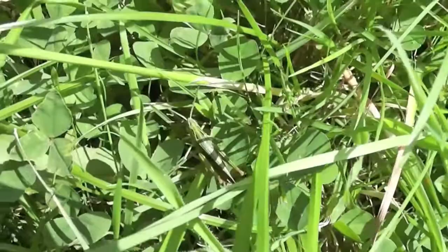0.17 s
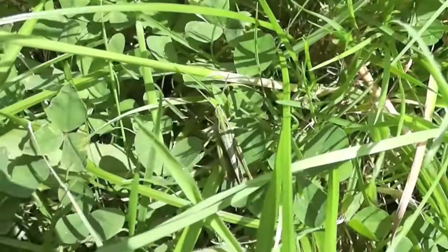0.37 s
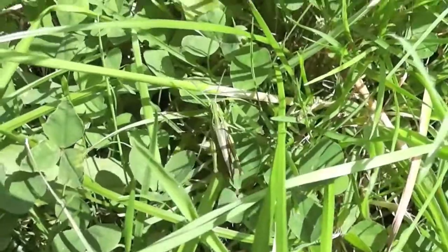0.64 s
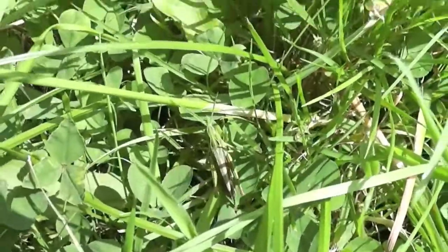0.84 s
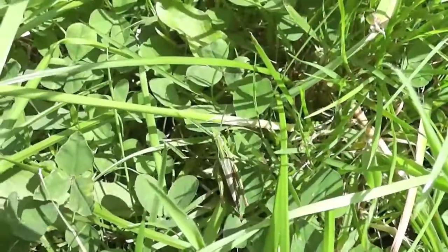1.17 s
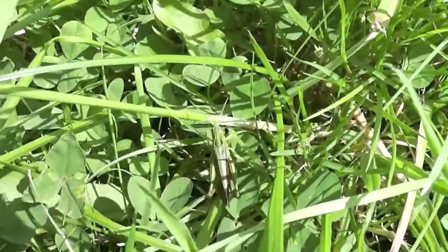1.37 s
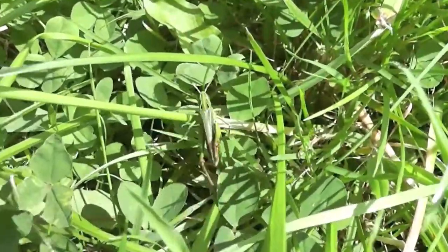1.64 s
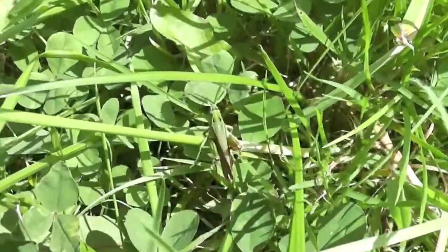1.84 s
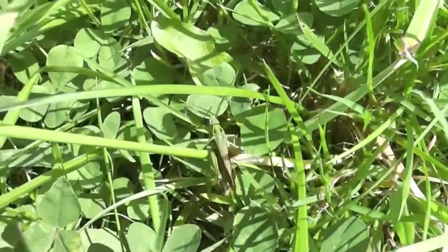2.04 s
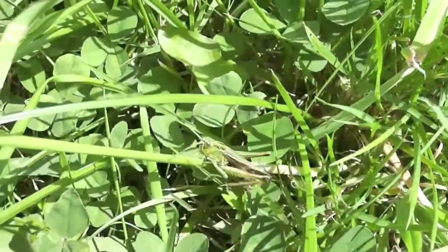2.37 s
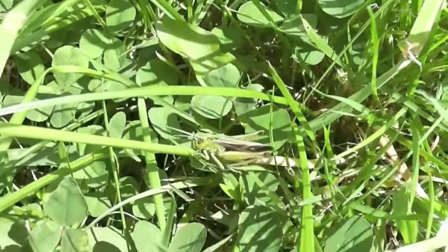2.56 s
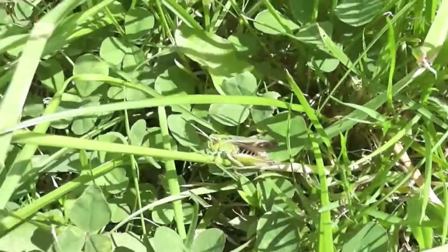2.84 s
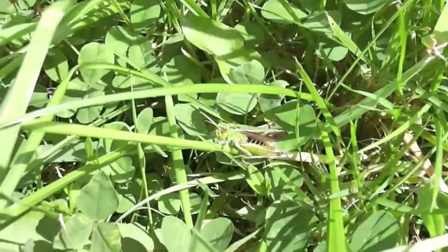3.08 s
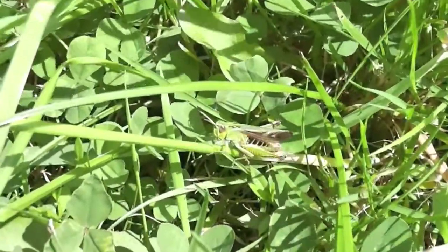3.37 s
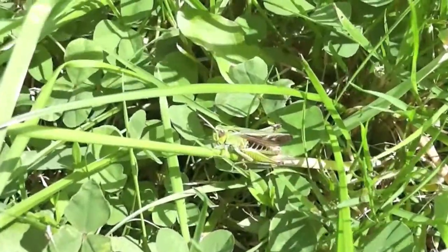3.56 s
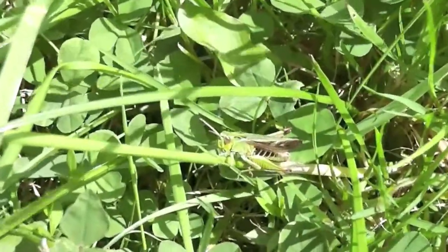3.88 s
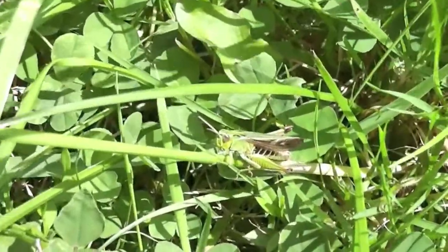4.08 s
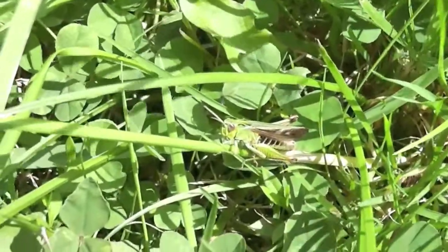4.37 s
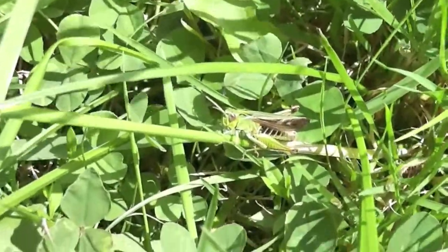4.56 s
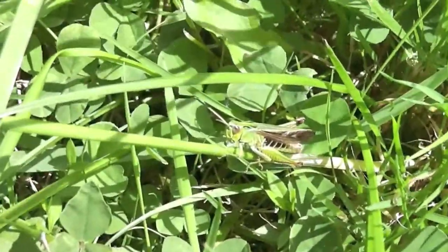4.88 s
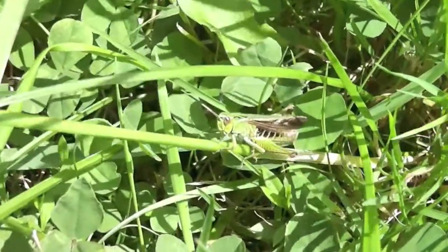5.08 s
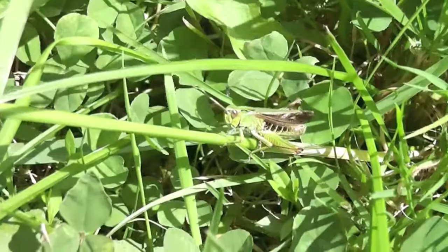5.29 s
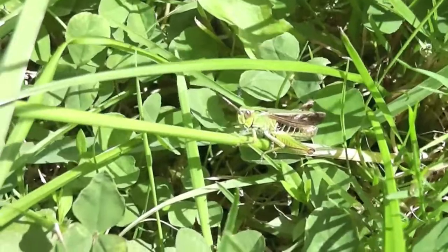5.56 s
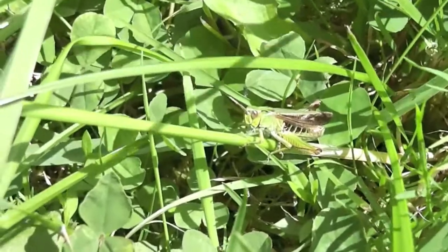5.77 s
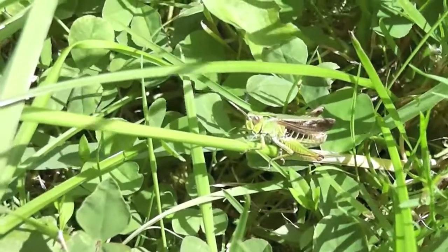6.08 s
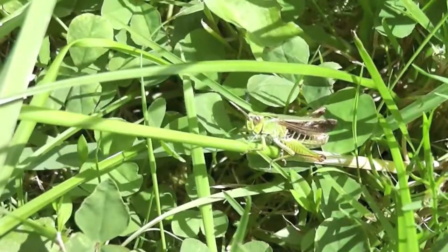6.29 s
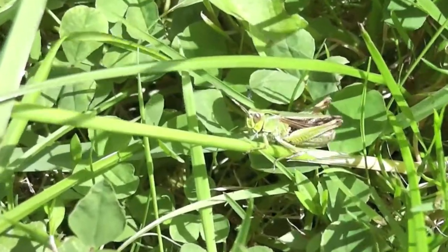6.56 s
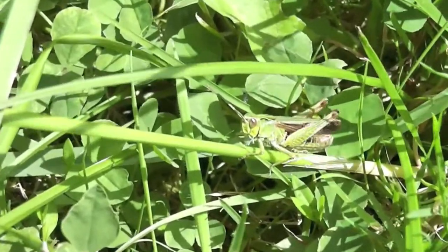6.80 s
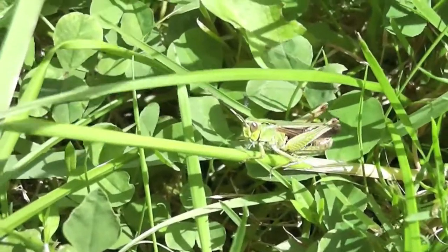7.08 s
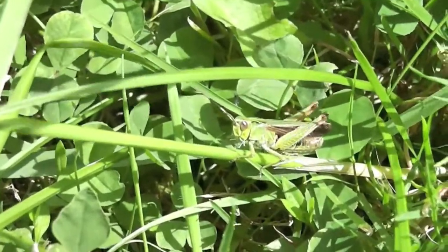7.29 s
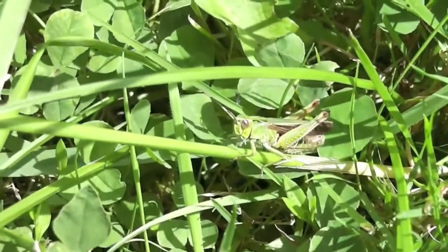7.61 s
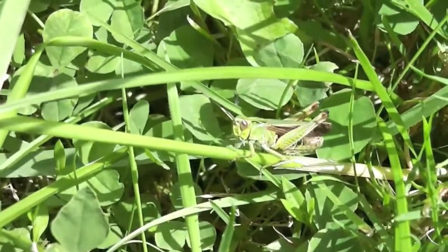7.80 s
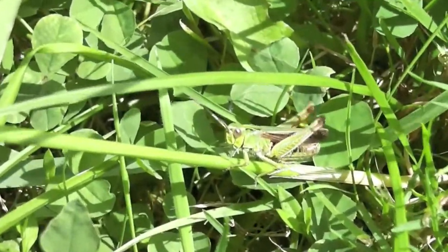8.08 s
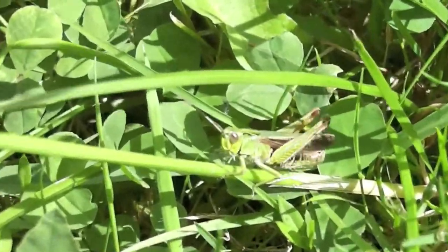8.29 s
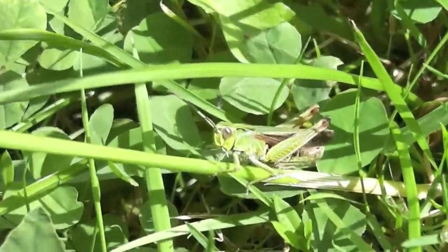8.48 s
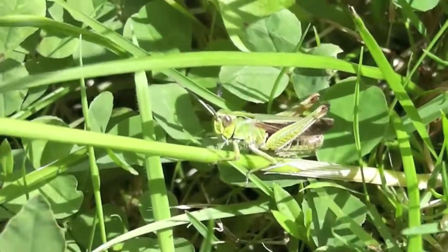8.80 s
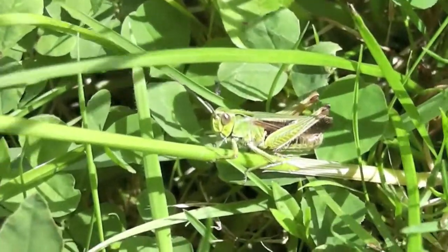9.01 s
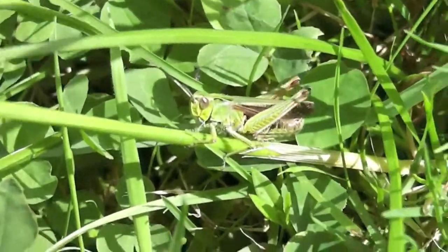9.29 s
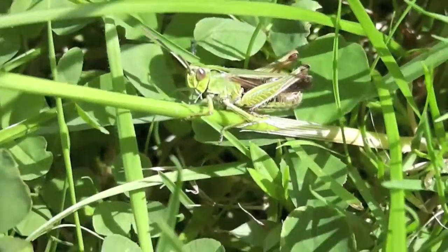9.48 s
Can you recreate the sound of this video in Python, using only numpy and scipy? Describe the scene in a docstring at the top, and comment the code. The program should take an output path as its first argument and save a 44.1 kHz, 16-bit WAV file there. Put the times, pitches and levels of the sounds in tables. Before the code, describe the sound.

A grasshopper close by shifts with dry ticks, then sings a fast, swelling, raspy buzz over a steady low machinery rumble outdoors.

```python
"""Grasshopper in clover

A grasshopper sits in clover a hand's width from a small stereo microphone. It shifts its legs with dry ticks
as leaves brush, then sings: pegs on the leg snap over a wing vein and ring the wing, in swelling strokes that
slow from about 21 to 19 a second. Far off, machinery hums as wavering tones and buzzes as throbbing noise, over
a rumble and hiss of shaped noise. Lumpy low noise sits opposite in left and right for a while, low knocks thud,
and one faint tick sounds early on.
"""
import sys
import numpy as np
from scipy import signal
from scipy.fft import rfft, irfft, next_fast_len
from scipy.io import wavfile
from scipy.ndimage import uniform_filter1d

SR = 44100
rng = np.random.default_rng(int(sys.argv[2]) if len(sys.argv) > 2 else 0)


def store_wav(level_fs):
    """Save 16-bit WAV to argv[1]."""
    pcm = np.round(np.clip(np.atleast_2d(level_fs), -1, 1) * 32767)
    wavfile.write(sys.argv[1], SR, pcm.T.astype(np.int16))


N = 425565  # samples in the scene


def from_db(db):
    """Gain of a level in dB."""
    return 10 ** (np.asarray(db) / 20)


def rms_one(x):
    """Scaled to rms 1."""
    return x / np.sqrt(np.mean(x ** 2) + 1e-20)


def in_time(rows):
    """Each column of a curve at every sample."""
    s, *columns = np.transpose(rows)
    return [np.interp(np.arange(N) / SR, s, column) for column in columns]


def over_hz(rows, hz):
    """Each column of a table read on a log-frequency axis."""
    at_hz, *columns = np.transpose(rows)
    return [np.interp(np.log(hz), np.log(at_hz), column) for column in columns]


def add(out, s, sound, peak_db):
    """Mixes a short sound in at s seconds, scaled to a peak level."""
    start = round(s * SR)
    out[start:start + len(sound)] += from_db(peak_db) * sound / np.abs(sound).max()


def resonance(x, hz, width_hz):
    """Two-pole band-pass with gain 1 on top."""
    r = np.exp(-np.pi * width_hz / SR)
    b = [(1 - r * r) / 2, 0, (r * r - 1) / 2]
    a = [1, -2 * r * np.cos(2 * np.pi * hz / SR), r * r]
    return signal.lfilter(b, a, x + 1e-18)


def double_resonance(x, hz, width_hz):
    """The same resonance twice in a row: a slower onset and steeper sides."""
    return resonance(resonance(x, hz, width_hz), hz, width_hz)


def steadied(drive, hz, width_hz):
    """The drive evened out over 4 ms, so that a resonance at hz rings more steadily."""
    power = double_resonance(drive, hz, width_hz) ** 2
    local = uniform_filter1d(power, size=round(4 * SR / 1000))
    return drive * np.sqrt(power.mean() / (local + 0.26 * power.mean()))


def waver(width_hz):
    """Slow complex noise of about rms 1: a tone multiplied by it spreads over about width_hz."""
    r = np.exp(-80 * np.pi * width_hz / SR)  # one slow point every 40 samples
    noise = rng.standard_normal((2, N // 40 + 2002))
    re, im = signal.lfilter([1], [1, -2 * r, r * r], noise)[:, 2000:]  # skip the filter's start
    slow = (re + 1j * im) / np.sqrt(np.mean(re ** 2 + im ** 2))
    return np.interp(np.arange(N) / 40, np.arange(len(slow)), slow)


def pegs(per_s, uneven_db):
    """Leg pegs snapping over the wing vein one after another, unevenly spaced and sized; rms 1."""
    count = int(2 * per_s * N / SR)
    at = np.cumsum(SR / per_s * rng.uniform(.5, 1.5, count)).astype(int)
    size = from_db(uneven_db * np.clip(rng.standard_normal(count), -3, 2)) * rng.choice([-1, 1], count)
    out = np.zeros(N)
    out[at[at < N]] = size[at < N]
    return rms_one(out)


# How far sound differs between the two channels, by frequency:
# (frequency [Hz], side under mid [dB], left over right [dB], phase by which left leads [radians])
CHANNEL_DIFFERENCES = [(30, -70, 0, 0), (1100, -60, 0, 0), (1400, -15, 0, 0), (2000, -9, 1.5, .4),
                       (2500, -7, 1, .4), (3400, -10, 5.5, .6), (4000, -6, 5, .5), (5500, -9, 6.5, .9),
                       (6500, -8, 4.5, 1.6), (7600, -7, 2, 2.8)]


def far_noise(spectrum):
    """Stereo noise of a spectrum, partly alike in the two channels; rms 1."""
    size = next_fast_len(N)
    hz = np.arange(1, size // 2 + 2) * SR / size
    side_db, lean_db, lead = over_hz(CHANNEL_DIFFERENCES, hz)
    mid, side = rfft(rng.standard_normal((2, size))) * from_db(over_hz(spectrum, hz)[0])
    left = (mid + from_db(side_db) * side) * from_db(lean_db / 2)
    right = (mid - from_db(side_db) * side) * from_db(-lean_db / 2) * np.exp(-1j * lead)
    return rms_one(irfft([left, right], size)[:, :N])


RUMBLE_SURGE_DB = 0.5  # scale of the random surges
# Background levels before each layer's own trim:
# (time [s], deep rumble [dB], upper rumble [dB], air hiss [dB], far machine buzz [dB])
BACKGROUND_LEVELS = [(0, -21, -34, -46.5, -55), (.5, -23, -34.5, -46, -48.5),
                     (2.2, -24.5, -34, -47.5, -52.5), (2.85, -25, -34.5, -47.5, -58),
                     (2.92, -23.5, -32.5, -42.5, -52), (3.05, -22.5, -33.5, -43, -51),
                     (3.15, -21, -32.5, -44, -55), (3.3, -24, -31.5, -44, -58),
                     (3.42, -24.5, -34, -44.5, -55), (3.55, -25.5, -35, -45, -50.5),
                     (4.2, -25.5, -36.5, -47, -50.5), (5.1, -24, -35, -47.5, -54),
                     (5.9, -29.5, -35.5, -45.5, -50), (6.18, -18.5, -35.5, -46.5, -53.5),
                     (6.9, -24, -35.5, -49, -56.5), (7.0, -17.5, -32, -45, -53.5),
                     (7.4, -22.5, -36.5, -46.5, -58), (8.0, -24, -36.5, -47.5, -52.5),
                     (9.65, -25, -36.5, -46, -56.5)]


def background_levels():
    """Background levels over time, the upper rumble surging at random."""
    deep_db, upper_db, hiss_db, buzz_db = in_time(BACKGROUND_LEVELS)
    return deep_db, upper_db + RUMBLE_SURGE_DB * waver(2.0).real, hiss_db, buzz_db


# Spectrum shapes of the deep and the upper rumble: (frequency [Hz], relative density [dB per Hz])
DEEP_SPECTRUM = [(20, -35.5), (35, -25.5), (55, -8), (100, -3), (200, 1), (330, -1), (420, -5.5),
                 (600, -48.5)]
UPPER_SPECTRUM = [(250, -31), (340, 2), (420, -1), (520, -5), (750, -17), (1000, -27), (1500, -55.5)]


def rumble(deep_db, upper_db):
    """Far rumble: two bands of noise, the deep one surging at random on its own."""
    deep = from_db(deep_db - 5.5 + RUMBLE_SURGE_DB * waver(2.7).real) * far_noise(DEEP_SPECTRUM)
    upper = from_db(upper_db + 0.5) * far_noise(UPPER_SPECTRUM)
    return deep + upper


# Spectrum shape of the air hiss: (frequency [Hz], relative density [dB per Hz])
HISS_SPECTRUM = [(500, -5), (1000, -3), (1400, -3), (1900, 2), (2250, -5), (2600, -13), (3300, -9.5),
                 (3950, -10.5), (4900, -9.5), (5500, -7), (6500, -9.5), (7400, -14.5), (7700, -59),
                 (9000, -84)]


def hiss(hiss_db):
    """Air hiss: shaped noise that follows its level curve."""
    return from_db(hiss_db + 2.5) * far_noise(HISS_SPECTRUM)


BUZZ_THROB_HZ, BUZZ_THROB_DB = 68.2, 4.5  # the rate of a strong low hum tone; swing each way
# Spectrum shape of the far machine buzz: (frequency [Hz], relative density [dB per Hz])
BUZZ_SPECTRUM = [(2500, -27.5), (3000, -3), (3400, 0.5), (3750, -7.5), (4200, -29.5)]


def buzz(buzz_db):
    """Far machine buzz: noise near 3.4 kHz, throbbing 68 times a second and flickering at random."""
    throb_db = BUZZ_THROB_DB * np.cos(2 * np.pi * BUZZ_THROB_HZ * np.arange(N) / SR)
    return from_db(buzz_db - 2.5 + 2.6 * waver(47).real + throb_db) * far_noise(BUZZ_SPECTRUM)


# Far machinery: (frequency [Hz], steady level [dB rms], wavering level [dB rms], width [Hz])
HUM_TONES = [(48.7, -55.5, -54, 2.3), (68.2, -45, -42, 6.7), (99.2, -42, -42.5, 3.3),
             (136.44, -31.5, -40.5, 6.5), (148.7, -38, -39.5, 3.3), (199, -49, -39.5, 3.3),
             (234.6, -43.5, -48, 2.8), (252.1, -38, -39, 5.9), (293.9, -42, -42, 5.1),
             (426.7, -51, -52, 1.5), (480.6, -48, -47, 8), (594.3, -48, -55.5, 3.3), (635, -66.5, -63, 6.6),
             (717, -66, -60.5, 10), (1112, -76.5, -60.5, 16), (1307, -78, -64, 23)]


def hum(upper_db):
    """Far tones waver on their way through the air; those above 400 Hz partly follow the upper rumble."""
    t, out = np.arange(N) / SR, np.zeros(N)
    lift = from_db(upper_db - upper_db.mean())
    for hz, steady_db, waver_db, width_hz in HUM_TONES:
        strength = from_db(steady_db) + from_db(waver_db) * waver(width_hz)
        carried = np.sqrt(lift) if hz > 400 else 1
        out += carried * (strength * np.exp(2j * np.pi * hz * t)).real
    return np.sqrt(2) * out  # a sine of rms 1 peaks at sqrt(2)


# A hum tone that beats and fades: (time [s], level before waver and left-right lean [dB])
WHINE_LEVELS = [(0.0, -37), (0.05, -23), (0.13, -33.5), (0.35, -23.5), (0.4, -32.5), (0.64, -19.5),
                (0.78, -37.5), (0.88, -29), (1.83, -35.5), (2.23, -32), (2.52, -46), (2.61, -35),
                (3.89, -36.5), (4.06, -32), (4.11, -53), (4.16, -36), (4.35, -29), (4.49, -47), (4.76, -25),
                (4.97, -49), (5.16, -23), (5.24, -47), (5.29, -30.5), (5.54, -47), (5.59, -29.5),
                (5.91, -42), (6.15, -42), (7.2, -36), (7.26, -54), (7.31, -43), (7.47, -30.5), (7.52, -46),
                (7.74, -29), (7.79, -55), (8.04, -32), (8.19, -60), (8.3, -39.5), (8.79, -51), (9.54, -43),
                (9.65, -39)]
# Its drifting pitch: (time [s], frequency [Hz])
WHINE_PITCH = [(0, 375), (.65, 371), (1.5, 373), (3, 372.7), (5, 370.4), (6.5, 373), (9.65, 369.3)]


def whine():
    """One drifting machinery tone that beats and fades, slightly louder on the left."""
    phase = 2 * np.pi * np.cumsum(in_time(WHINE_PITCH)[0]) / SR
    tone = ((1 + 0.23 * waver(4.05)) * np.exp(1j * phase)).real
    return np.sqrt(2) * from_db(in_time(WHINE_LEVELS)[0]) * tone * from_db([[.4], [-.4]])


SIDE_START_S, SIDE_END_S, SIDE_EDGE_S = 2.49, 6.04, 0.17  # the edges lie outside start and end
SIDE_DB = -43  # level about which the noise wavers


def low_side_noise():
    """Lumpy low noise, opposite in left and right, from about 2.3 to 6.2 s."""
    t = np.arange(N) / SR
    fade = np.clip(np.minimum(t - SIDE_START_S, SIDE_END_S - t) / SIDE_EDGE_S + 1, 0, 1) ** 2
    band = signal.butter(3, [18, 110], "band", fs=SR, output="sos")
    low = rms_one(signal.sosfilt(band, rng.standard_normal(N)))
    return fade * from_db(SIDE_DB + 4.5 * waver(3.0).real) * low * [[1], [-1]]


KNOCK_T60_S, KNOCK_RISE_S = 0.1, 0.001  # of the noise before filtering
# Dull low knocks: (time [s], peak level before a 3 dB cut [dB], pitch [Hz])
KNOCK_EVENTS = [(3.045, -15.5, 485), (3.126, -21, 476), (3.246, -23, 430), (3.3, -26, 600),
                (3.349, -12.5, 145), (6.141, -13, 264), (6.175, -15.5, 199), (6.269, -17.5, 222),
                (6.38, -17.5, 181), (6.519, -13.5, 273), (6.687, -17, 137), (6.771, -16, 348),
                (6.875, -11.5, 137), (6.982, -12.5, 133), (7.141, -21, 135), (7.761, -19, 141)]


def knocks():
    """Low puffs of noise with a dull ring, the same in both channels."""
    out, band = np.zeros(N), signal.butter(2, [90, 550], "band", fs=SR, output="sos")
    age = np.arange(SR // 3) / SR
    shape = from_db(-60 * age / KNOCK_T60_S) * (1 - np.exp(-age / KNOCK_RISE_S))
    for s, peak_db, hz in KNOCK_EVENTS:
        puff = signal.sosfilt(band, rng.standard_normal(len(age)) * shape)
        add(out, s, 0.5 * puff + resonance(puff, hz, 60), peak_db - 3.0)
    return out


CRACKLES_PER_S, CRACKLE_SHARE = 760, 0.45
# Spectrum shape of rubbing leaves: (frequency [Hz], relative density [dB per Hz])
LEAF_SPECTRUM = [(1000, -26.5), (2000, -11), (4000, 3), (6000, 0.5), (7200, -3.5), (8000, -31)]
# Leaves brushed close by: (time [s], starting level before the mix of grains and crackle [dB], t60 [s])
LEAF_BRUSHES = [(2.897, -47, 1), (3.25, -43, .12), (3.277, -43, .1), (3.37, -41, .1), (3.38, -60, 1.4)]


def rustle():
    """Each brush starts at once and dies away; the leaves rub in small grains and crackle."""
    t = np.arange(N) / SR
    level = sum((t > s) * from_db(db - 60 * np.abs(t - s) / t60) for s, db, t60 in LEAF_BRUSHES)
    grains = from_db(2.7 * waver(60).real) * far_noise(LEAF_SPECTRUM)
    snaps = pegs(CRACKLES_PER_S, uneven_db=7.5)  # same uneven train of impulses as the leg pegs
    crackle = rms_one(double_resonance(snaps, 5700, 1800)) * from_db([[3], [-3]])
    return level * (1.2 * grains + CRACKLE_SHARE * crackle)


LEAF_COVER_HZ = 7900  # ticks under the leaves lose their top
TICK_START_SHARE = .55  # a scratch starts at this share of its strength and swells
# Legs shifting on the stem: (time [s], peak level before leaf cover and left-right lean [dB],
# pitch [Hz], scratch length [ms], t60 of the scratch [s], amount of broad ring [0-1])
LEG_TICKS = [(2.894, -38, 6300, 1, .008, .2), (2.8992, -28, 5300, 1.5, .02, .3),
             (2.905, -33, 6460, 3, .02, .2), (2.9135, -41, 5600, .5, .008, .3),
             (2.922, -38, 5500, .5, .008, .2), (3, -31, 5700, 1.9, .01, .6),
             (3.0452, -29, 5200, 1, .008, 1.0), (3.053, -36, 6100, .5, .01, .2),
             (3.0664, -32, 6140, 2, .01, .3), (3.0875, -36, 5000, .5, .01, .2),
             (3.0944, -37, 5200, 1, .015, .2), (3.211, -29, 5950, 2.3, .012, .3),
             (3.2297, -27, 6100, 4.4, .012, 0.2), (3.2482, -20.5, 5800, 2.2, .003, 0.24),
             (3.2545, -37, 6300, .5, .008, .3), (3.2744, -28, 5920, 4.1, .006, .6),
             (3.283, -34, 5900, .5, .01, 0.3), (3.2875, -34, 6000, .5, .01, .2),
             (3.304, -37, 5000, .5, .01, .2), (3.361, -33, 6060, 3, .02, 0.1),
             (3.3717, -26.5, 5670, 2.2, .014, 0), (3.49, -36, 5700, 1, .015, .2)]


def ticks():
    """Each tick is a short scratch that swells and lets go, coloured by a narrow ring and a broad one."""
    out, age_ms = np.zeros(N), np.arange(SR // 20) / SR * 1000
    for s, peak_db, hz, hold_ms, t60, broad_share in LEG_TICKS:
        swell = np.interp(age_ms, [0, hold_ms], [TICK_START_SHARE, 1])
        release = from_db(-60 * np.maximum(age_ms - hold_ms, 0) / (1000 * t60))
        scratch = steadied(rng.standard_normal(len(age_ms)), hz, 1200) * swell * release
        broad = double_resonance(scratch, 4600, 3500)
        add(out, s, double_resonance(scratch, hz, 1000) + broad_share * broad, peak_db)
    cover = signal.butter(6, LEAF_COVER_HZ, fs=SR, output="sos")
    return signal.sosfilt(cover, out) * from_db([[3], [-3]])


UPSTROKE_RISE_DB = 14.5  # per 34 ms


def upstroke(samples, top_db):
    """A brief leaf echo, a quiet turn of the leg, then a slow swell, all set by the given level."""
    age = np.arange(samples) / SR
    swell = from_db(UPSTROKE_RISE_DB * (age / 0.034 - 0.5)) * np.clip((age - .006) / 0.01, .3, 1)
    return from_db(top_db) * (swell + np.exp(-age / 0.0082))


PEGS_PER_S, UPSTROKE_PEGS_PER_S = 1900, 1200
PEG_UNEVEN_DB = 3  # spread of the peg sizes
RING_OUT_MS = 2.1  # the leg stops this long before the stroke's end, leaving wing and microphone to ring
BITE_PEAK_MS, BITE_WIDTH_HZ = 0.91, 1630  # rise of the catch's envelope; width of each of its two resonances
BITE_TONE_SHARE = .3  # the bite locks partly onto its pitch
COLOUR_SCATTER_DB = 1.8  # no two half strokes excite the wing alike
# Wing resonances: (frequency [Hz], width [Hz], relative level through the downstroke [dB],
# relative level on the upstroke [dB], left over right [dB])
WING_RESONANCES = [(4230, 2400, -18.5, -43, -2), (5120, 1600, -6.5, -28, -1), (5750, 810, -4.5, -23.5, -1),
                   (6990, 1400, 1, -20.5, 3), (7500, 900, 0, -18, 7), (8440, 1000, 2.5, -14, 7)]
# Downstrokes: (end time [s], length [ms], relative level of first half [dB], of second half [dB],
# level of the first bite before trim and lean [dB], bite pitch [Hz])
DOWNSTROKES = [(6.6903, 9.0, -57.0, -56, -60.0, 4350.0), (6.7381, 11, -55, -50, -57.0, 4670.0),
               (6.7861, 11, -51, -51, -55.0, 4350.0), (6.8336, 9.8, -54.5, -45, -55, 5520.0),
               (6.8824, 11, -44, -48, -42, 5080.0), (6.9287, 11, -43, -44.0, -30, 5600.0),
               (6.9766, 10, -31, -40, -27, 5540.0), (7.0267, 13, -32, -43, -33, 5150),
               (7.072, 11, -30, -36, -31, 5720.0), (7.1229, 12, -29.5, -38, -33, 5430.0),
               (7.1718, 12.4, -28.5, -35, -36, 5100.0), (7.2195, 11, -28, -34, -32, 5340),
               (7.27, 11.4, -27.5, -33, -34, 5300), (7.321, 12.5, -28.0, -33, -37, 5370),
               (7.3698, 12, -32, -33, -32, 5670.0), (7.42, 13, -29.5, -37, -35, 4400),
               (7.4702, 10.8, -27, -33, -37, 5100), (7.5208, 12.3, -28, -32, -29.5, 5060.0),
               (7.5713, 11, -31, -30, -26, 5010.0), (7.6215, 12, -28, -34, -32.5, 4770.0),
               (7.6727, 12.7, -28, -31, -23, 5140), (7.7223, 10.5, -29, -27.5, -30, 5260),
               (7.772, 14, -29, -30, -33, 5300), (7.8245, 11, -26, -31, -26, 5260),
               (7.874, 11.6, -28, -31, -24, 5310.0), (7.9255, 13, -32, -27.5, -29, 5000),
               (7.9765, 12.3, -31.5, -30, -27, 5100), (8.0289, 11, -28, -32, -25, 4930.0),
               (8.0803, 14, -29, -32, -28, 5260.0), (8.1322, 14, -28.5, -28.5, -28.5, 5080.0),
               (8.1847, 14, -27.5, -28, -29, 5310.0), (8.2366, 9.4, -31, -27, -24, 5200.0),
               (8.2876, 15, -28.0, -29.5, -30, 5620.0), (8.3427, 13.7, -27.5, -29, -28, 5330.0),
               (8.393, 13, -30, -29, -29.5, 5120.0), (8.447, 14.4, -27.5, -31.5, -29, 5200.0),
               (8.5, 13.5, -28.5, -28, -27.0, 4870), (8.553, 15, -28, -26, -26, 5100),
               (8.6045, 13.6, -29, -27, -21, 5240), (8.659, 15, -28, -26.5, -22, 5120.0),
               (8.71, 15, -29, -24.5, -25, 5030), (8.7624, 11.4, -28, -25.5, -29, 5100),
               (8.8147, 12.6, -27.0, -27.5, -31, 4630.0), (8.8667, 14, -25.5, -28, -35, 4530.0),
               (8.9214, 14.5, -25.5, -28.5, -35, 4560.0), (8.975, 16, -27.5, -27, -28, 4800),
               (9.0263, 14, -25.5, -27, -25, 4900), (9.08, 15, -29, -24.5, -26, 4970),
               (9.1322, 13, -29.5, -24.5, -26, 4900.0), (9.1865, 11, -24, -25, -30, 5000),
               (9.239, 15, -25, -26.5, -34, 4700), (9.2927, 14, -25.5, -27, -31, 4440),
               (9.346, 14, -26, -24.5, -26, 4990.0), (9.3998, 14.5, -28, -24, -26.5, 4890.0),
               (9.4538, 16, -25, -23, -27, 5120.0), (9.5067, 14, -24, -25.5, -25, 4790.0),
               (9.5604, 14.3, -26, -24.5, -28, 5070.0), (9.6138, 15, -25, -24.5, -29, 4780.0)]


def song():
    """A faint swelling upstroke, then a loud downstroke that bites low, rings high and stops dead."""
    down, up, bites = np.zeros((3, N))
    begin = last = round((DOWNSTROKES[0][0] - .05) * SR)
    legs = [pegs(PEGS_PER_S, PEG_UNEVEN_DB) for leg in range(2)]  # each sounds different wing parts
    age_s = np.arange(SR // 100) / SR
    age = age_s / (BITE_PEAK_MS / 1000)
    for end_s, length_ms, first_db, second_db, bite_db, bite_hz in DOWNSTROKES:
        start = round((end_s - length_ms / 1000) * SR)
        end = round((end_s - RING_OUT_MS / 1000) * SR)
        part = np.linspace(0, 1, end - start)
        shape_db = [first_db - 5, first_db - 12.5, first_db + 0.5, first_db - 0.5,
                    second_db + 0.5, second_db + 3.0]
        down[start:end] = from_db(np.interp(part, [0, .1, .22, .55, .76, 1], shape_db))

        tone = np.sin(2 * np.pi * bite_hz * age_s)
        rough = 0.45 * legs[0][start:start + len(age)]
        catch = (BITE_TONE_SHARE * tone + (1 - BITE_TONE_SHARE) * rough) * age * np.exp(-age ** 2 / 2)
        add(bites, start / SR, double_resonance(catch, bite_hz, BITE_WIDTH_HZ), bite_db - 1.5)

        up[last:start] = upstroke(max(start - last, 0), second_db)  # level of the coming downstroke
        last = end
    up[last:] = upstroke(N - last, DOWNSTROKES[-1][3])

    slow = pegs(UPSTROKE_PEGS_PER_S, uneven_db=3.0)
    scatter = pegs(PEGS_PER_S, uneven_db=10.0) * [[1], [-1]]  # leaves scatter a share, opposite left and right
    half_ends = np.ravel([(row[0] - row[1] / 2000, row[0]) for row in DOWNSTROKES])  # middle and end [s]
    half_stroke = np.searchsorted(half_ends, np.arange(N) / SR)
    colour_db = COLOUR_SCATTER_DB * rng.standard_normal((len(half_ends) + 1, len(WING_RESONANCES)))
    out = bites * from_db([[-.3], [.3]])
    for k, (hz, width_hz, down_db, up_db, lean_db) in enumerate(WING_RESONANCES):
        fast = from_db(down_db + colour_db[:, k])[half_stroke] * down
        soft = from_db(up_db) * up
        # a regular row of pegs rings the wing steadily
        drive = fast * steadied(legs[k % 2], hz, width_hz) + soft * slow + 0.21 * (fast + soft) * scatter
        rings = double_resonance(drive[:, begin:], hz, width_hz)
        out[:, begin:] += rings * from_db([[10.0 + lean_db / 2], [10.0 - lean_db / 2]])
    return out


def scene():
    """Insect in front, background behind."""
    deep_db, upper_db, hiss_db, buzz_db = background_levels()
    background = rumble(deep_db, upper_db) + hiss(hiss_db) + buzz(buzz_db) + hum(upper_db) + whine()
    return background + low_side_noise() + knocks() + rustle() + ticks() + song()


STEP_S, STEP_DB, STEP_FADE_MS = 1.5362, -22, 1.7  # start, peak before the last filter, time constant


def faint_tick():
    """One faint tick, a sudden step that fades, the same in both channels."""
    out = np.zeros(N)
    age_ms = np.arange(SR // 100) / SR * 1000
    add(out, STEP_S, -np.exp(-age_ms / STEP_FADE_MS), STEP_DB)
    return out


MICROPHONE_TOP_HZ, CUTOFF_HZ = 9500, 17000  # each low-pass is 70 dB down from here up


def record(dry):
    """The microphone loses the top; the faint tick joins after it, and a last low-pass cuts higher up."""
    microphone = signal.cheby2(12, 70, MICROPHONE_TOP_HZ, fs=SR, output="sos")
    last_cut = signal.cheby2(12, 70, CUTOFF_HZ, fs=SR, output="sos")
    heard = signal.sosfilt(microphone, dry) + faint_tick()
    return signal.sosfilt(last_cut, heard)


dry = scene()
out = record(dry)
store_wav(out)
```